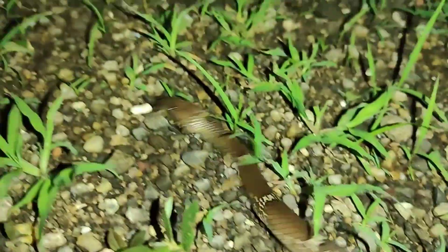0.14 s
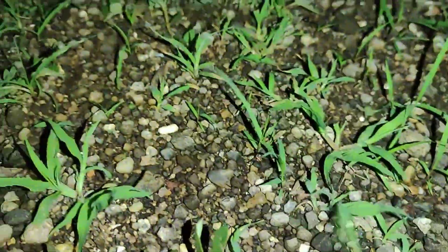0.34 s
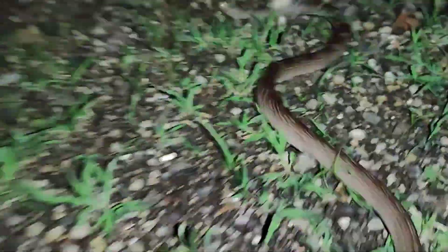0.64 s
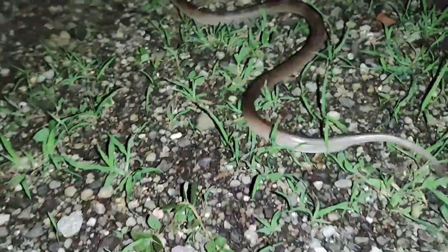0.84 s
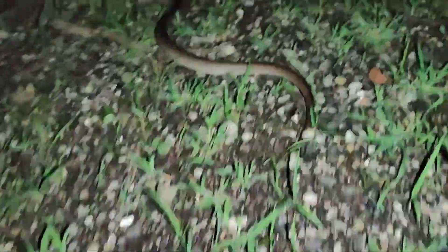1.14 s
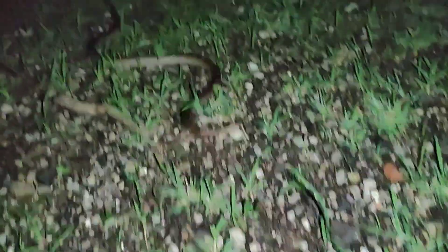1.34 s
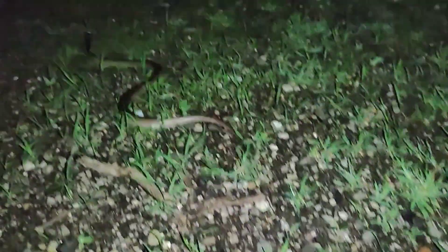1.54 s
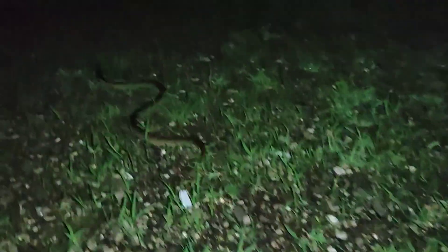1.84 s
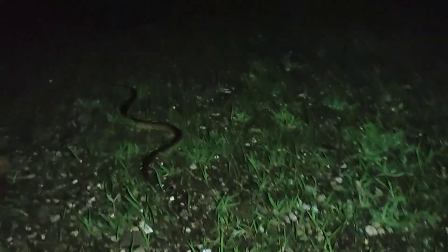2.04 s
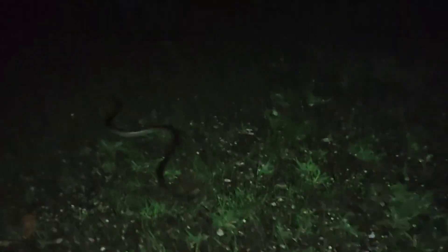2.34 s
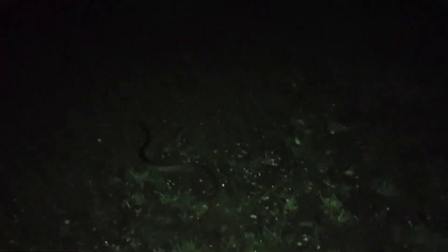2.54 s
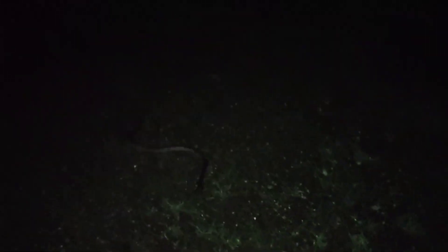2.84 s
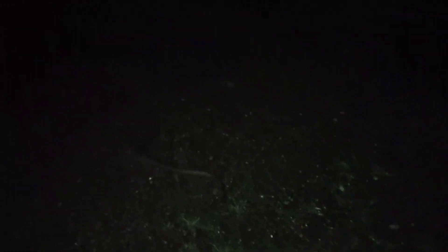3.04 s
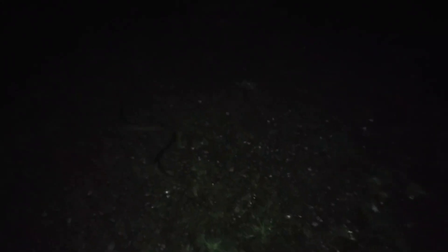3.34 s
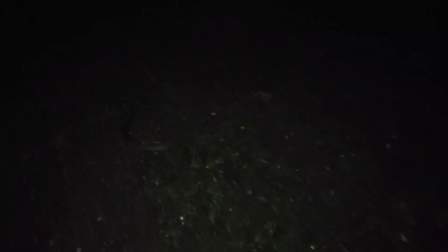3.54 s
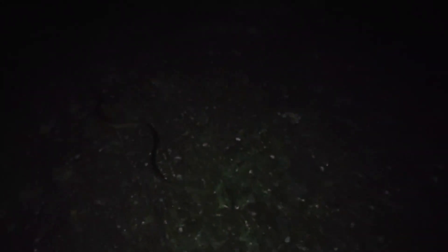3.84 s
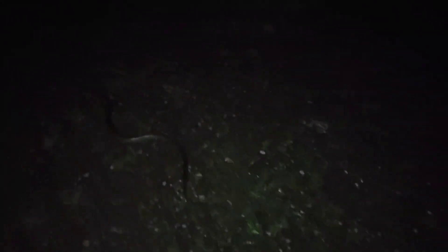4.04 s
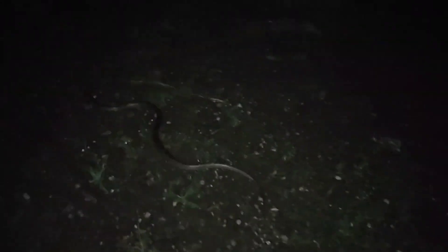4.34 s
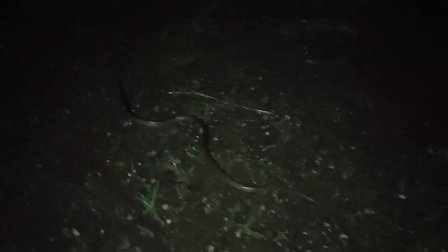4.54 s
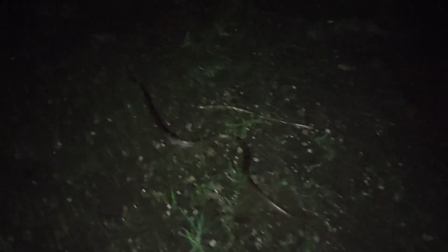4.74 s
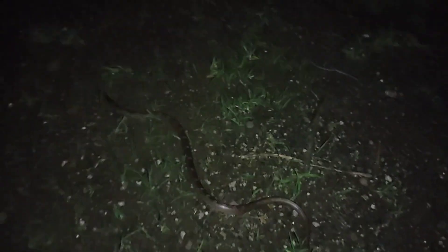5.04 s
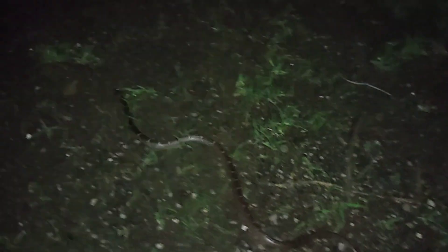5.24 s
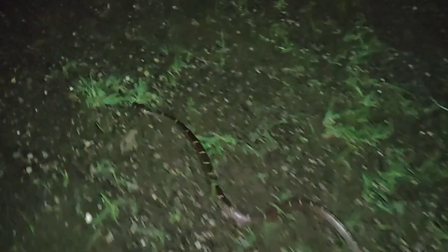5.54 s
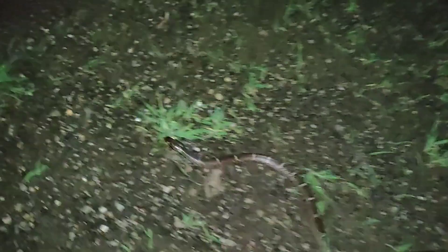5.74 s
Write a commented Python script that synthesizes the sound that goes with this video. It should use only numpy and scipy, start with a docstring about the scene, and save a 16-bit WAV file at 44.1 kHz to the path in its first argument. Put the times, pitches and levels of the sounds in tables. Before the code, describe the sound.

A high night chorus of crickets carries on over scuffing gravel steps, small stone clicks, rustling weeds and a faint distant bird.

```python
"""A walk through a night meadow with a hand-held two-port recorder. From the start, over hissing air
and a dull rumble, crickets stridulate: a far chorus, steady tree crickets and near ones trilling in
turns. Fingers rub the case, stones knock, weeds brush the legs and gravel crunches. A far bird begins
to whistle, dry stalks snap and wind puffs on the right port. Near one second a katydid starts to buzz
and something creaks briefly; about halfway through, a higher cricket joins with five chirps."""
import sys
import numpy as np
from scipy import signal
from scipy.fft import rfft, irfft
from scipy.io import wavfile

SR = 44100
rng = np.random.default_rng(int(sys.argv[2]) if len(sys.argv) > 2 else 0)


def generate_wav(sig):
    """Save sig (samples, or channels by samples) to the path in sys.argv[1] as 16-bit PCM at SR."""
    pcm = np.round(np.clip(np.atleast_2d(sig).T, -1, 1) * 32767).astype(np.int16)
    wavfile.write(sys.argv[1], SR, pcm)


N = 259749

# Spectrum of the night air. Each row: frequency in Hz, relative spectral density in dB.
AIR_SPECTRUM = [(30, -8.5), (60, 4), (140, -20.5), (300, -10.5), (1000, -18), (2200, -12.5), (2800, -11),
                (3350, -13.5), (4500, -6), (5750, -53), (6400, -27), (7300, -26), (9700, -16.5),
                (12000, -35), (16000, -29)]
# Drift of the air's level. Each row: time in seconds, gain in dB.
AIR_DRIFT = [(0, -0.5), (1, -1.5), (1.6, -2.5), (2.8, -0.5), (3.9, -2), (4.8, 1), (5.89, -2.5)]
# A dull far rumble. Each row: time in seconds, level in dB.
RUMBLE_LEVEL = [(0, -60), (1, -53.5), (1.5, -53), (1.9, -59), (2.4, -56), (3, -62), (4, -58.5),
                (5.2, -60.5), (5.89, -59)]
# Far cricket choruses, lowest first. Each row: pitch in Hz, pitch spread in Hz, glide in Hz,
# strokes per second, stroke length in seconds, level in dB, left minus right in dB.
CHORUSES = [(4098, 446, 346, 1100, 0.00657, -47.5, -4.5), (4982, 352, 370, 590, 0.0139, -48, -3.5),
            (6334, 500, 380, 500, 0.0128, -57, -5)]
# The low chorus and tree crickets grow as the walker nears. Each row: time in seconds, gain in dB.
NEARING_GAIN = [(0, -3), (1, -4), (1.55, -4), (1.9, 0.5), (3.3, 0), (4.4, 1.5), (5.89, 1)]
# Tree crickets. Each row: pitch in Hz, strokes per second, relative level in dB, left minus right in dB.
TREE_TRILLS = [(4086, 82, -54, 2), (4166, 58, -59, 6), (3917, 83, -61, -9)]
# Trills of near crickets. Each row: start in seconds, length in seconds, stroke count at mid-slowing,
# factor on the gaps, relative peak in dB, lead of the left port in microseconds at start and at end.
NEAR_CRICKET_TRILLS = [(-0.162, 0.39, 6.13, 0.95, -29.5, 37.0, 25.0),
                       (0.017, 0.37, 9.54, 1.017, -35.0, 55.0, 55.0),
                       (0.493, 0.38, 7.29, 0.952, -29.5, 27.0, 21.0),
                       (0.642, 0.35, 10.57, 1.007, -35.5, 55.0, 55.0),
                       (1.102, 0.36, 7.79, 0.935, -29.5, -5.0, 2.0),
                       (1.702, 0.41, 5.06, 0.895, -28.5, 110.0, 50.0),
                       (2.239, 0.06, 8.0, 1.08, -31.5, 35.0, 40.0),
                       (2.325, 0.27, 10.3, 0.95, -27.5, 38.0, 28.0),
                       (2.811, 0.38, 7.08, 1.033, -32.5, 20.0, 25.0),
                       (2.997, 0.38, 8.64, 0.933, -29.5, -5.0, -15.0),
                       (3.342, 0.35, 7.68, 0.974, -32.5, 40.0, 40.0),
                       (4.023, 0.35, 8.19, 1.012, -31.5, 25.0, 50.0),
                       (4.121, 0.19, 4.97, 0.998, -28.5, -40.0, -47.0),
                       (4.581, 0.41, 10.97, 1.085, -34.5, 35.0, 35.0),
                       (4.69, 0.31, 6.06, 0.997, -28.5, -35.0, -18.0),
                       (5.08, 0.29, 10.89, 1.162, -32.5, -30.0, -20.0),
                       (5.273, 0.38, 7.42, 0.958, -27.5, 28.0, 15.0),
                       (5.69, 0.21, 6.77, 1.017, -29.5, -65.0, -65.0)]
# Fingers rubbing the case. Each row: start in seconds, length in seconds, level in dB.
FINGER_RUBS = [(0, 0.29, -47), (0.196, 0.28, -42), (0.47, 0.35, -55), (0.856, 0.095, -35),
               (0.955, 0.1, -54), (1.048, 0.054, -43), (2.312, 0.0099, -45), (4.905, 0.072, -48),
               (5.699, 0.014, -40.5)]
# Stone knocks and finger taps. Each row: time in seconds, peak in dB, ring frequency in Hz.
KNOCKS_AND_TAPS = [(0.017, -38, 420), (0.098, -39, 208), (0.119, -42, 197), (0.205, -47, 410),
                   (0.1806, -32, 2240), (0.3702, -40, 2410), (0.7169, -37, 3400), (0.803, -33, 2000),
                   (0.779, -33, 1440), (0.788, -33.5, 1130), (0.861, -29.5, 370), (0.908, -24.5, 290),
                   (1.063, -37, 211), (1.083, -29, 259), (1.796, -46, 840), (1.819, -43, 1520),
                   (1.865, -28, 2370), (1.8797, -16, 1840), (1.886, -36, 1300), (1.905, -27, 1340),
                   (1.923, -21, 1700), (1.929, -25, 1570), (1.94, -36, 1330), (1.9733, -12.5, 2050),
                   (2.135, -21, 2140), (2.198, -36, 1800), (2.1905, -48, 1500), (2.221, -28.5, 1400),
                   (2.238, -37, 796), (2.386, -44, 860), (2.397, -36.5, 1050), (2.217, -31.5, 945),
                   (2.15, -35.5, 980), (2.274, -33, 1000), (2.307, -43, 915), (2.443, -35.5, 1260),
                   (2.9, -41, 980), (2.932, -36, 1400), (3.131, -42.5, 700), (3.244, -40, 1320),
                   (3.34, -39, 1310), (3.417, -48, 760), (3.423, -40, 600), (3.439, -36, 573),
                   (3.503, -36, 1480), (3.744, -34.5, 856), (3.886, -43, 660), (4.316, -32, 840),
                   (4.432, -40.5, 1100), (4.664, -39, 750), (4.884, -44, 660), (4.914, -43, 496),
                   (4.888, -32, 2360), (4.318, -33, 2100), (5.069, -35.5, 774), (5.073, -24, 1970),
                   (5.127, -28.5, 1710), (5.505, -37, 1950), (5.591, -38, 2100), (5.715, -36, 1120),
                   (5.748, -35, 1320), (5.825, -36, 1200), (5.835, -39, 1300), (5.771, -28, 740),
                   (5.773, -15, 1290)]
# Weeds brushing the legs. Each row: start in seconds, length in seconds, level in dB.
WEED_BRUSHES = [(0.126, 1, -49.5), (0.35, 0.1, -49.5), (0.506, 0.082, -49), (0.583, 0.12, -46),
                (0.779, 0.034, -45.5), (1.22, 0.3, -49.5), (1.466, 0.24, -57.5), (1.779, 0.21, -48.5),
                (2.146, 0.1, -57), (4.09, 0.052, -55), (5.054, 0.12, -58.5), (5.688, 0.23, -50)]
# Gravel under the shoes. Each row: start in seconds, length in seconds, relative level in dB,
# lower and upper band edges in Hz.
GRAVEL_SCUFFS = [(0.137, 0.76, -50.5, 1110, 3370), (0.766, 0.042, -44.5, 604, 4000),
                 (1.24, 0.18, -43, 1510, 4730), (1.77, 0.074, -51.5, 670, 2520),
                 (1.85, 0.11, -38, 725, 3600), (1.79, 0.16, -42.5, 795, 3200),
                 (1.94, 0.056, -46, 700, 2500), (1.98, 0.19, -54.5, 636, 2500),
                 (2.091, 0.17, -50, 690, 2980), (2.183, 0.36, -50, 715, 2360),
                 (2.308, 0.022, -45.5, 302.6, 1440), (2.95, 0.32, -64, 920, 2820),
                 (3.2, 0.26, -56, 670, 1890), (4.42, 0.21, -55, 1490, 3000), (0.98, 0.5, -57.5, 786, 3000),
                 (3.409, 0.086, -45, 290, 2040), (3.49, 0.17, -45.5, 890, 2280),
                 (3.733, 0.051, -50.5, 296, 1480), (3.868, 0.048, -46.5, 298, 2960),
                 (4.307, 0.045, -42, 298, 3550), (4.34, 0.092, -47.5, 507, 3040),
                 (4.639, 0.043, -49.5, 200, 1390), (4.8, 0.18, -52, 1510, 3050),
                 (4.86, 0.053, -58.5, 300, 875), (5.062, 0.099, -42.5, 305, 3100),
                 (5.198, 0.092, -54, 305, 2200), (5.492, 0.021, -50, 810, 2320),
                 (5.703, 0.04, -49.5, 195.7, 1750), (5.72, 0.08, -42.5, 6860, 8800),
                 (5.732, 0.21, -41, 627, 3650), (5.766, 0.016, -37.5, 400, 880)]
# A far night bird, one list a whistle. Each row: time in seconds, pitch in Hz, relative level in dB.
BIRD_WHISTLES = [
    [(.17, 2250, -62), (.55, 2380, -57), (.68, 2224, -56), (.71, 2220, -73)],
    [(1.26, 2250, -60), (1.38, 2260, -57), (1.43, 2178, -55), (1.52, 2274, -56), (1.565, 2120, -62),
     (1.59, 1750, -58), (1.625, 1750, -66), (1.66, 1760, -59), (1.69, 1800, -66), (1.77, 2000, -64)],
    [(2.41, 2090, -60), (2.54, 2097, -54.5), (2.64, 2070, -51), (2.67, 2180, -46), (2.715, 2040, -53),
     (2.722, 1830, -57), (2.76, 1740, -57), (2.79, 1710, -56)],
    [(2.792, 2150, -53), (2.808, 2070, -54), (2.84, 1680, -62)],
    [(4.56, 2132, -66), (4.7, 2030, -60), (4.74, 2030, -72), (4.79, 2130, -61), (4.83, 2020, -59),
     (4.89, 1780, -61)],
    [(5.45, 2066, -70), (5.72, 2230, -60), (5.78, 2280, -55), (5.89, 2160, -57)],
]
# Dry stalks snapping. Each row: time in seconds, peak in dB, ring frequency in Hz.
STALK_SNAPS = [(0.4244, -29, 12300), (0.4341, -36, 9080), (0.521, -28, 11000), (0.5362, -23, 11800),
               (0.578, -35, 10000), (0.623, -23, 6750), (0.6522, -19, 11000), (0.6584, -19, 12900),
               (0.781, -40, 12500), (0.79, -29, 11500), (0.8031, -27, 12000), (1.7575, -29, 8500),
               (2.1567, -27, 7460), (2.1648, -35, 7530), (2.1903, -37, 8300), (2.1981, -15, 7660),
               (2.1985, -32, 12600), (2.2207, -33, 9270), (2.2497, -31, 9000), (4.12, -40, 9800)]
# Wind puffs. Each row: start in seconds, length in seconds, relative level in dB.
WIND_PUFFS = [(0.454, 0.67, -77), (2.45, 0.25, -57.5), (3.676, 0.17, -52), (4.1, 0.22, -78),
              (4.406, 0.4, -46.5), (4.69, 0.036, -36), (5.033, 0.36, -52), (5.736, 0.056, -33)]
# The katydid's voice. Each row: time in seconds, level in dB, wing resonance in Hz.
KATYDID_VOICE = [(.84, -54, 9970), (1.2, -59.5, 9900), (1.5, -54, 9800), (1.9, -60.5, 9600),
                 (2.6, -60.5, 9750), (3.1, -59.5, 9800), (3.6, -58, 9520), (3.9, -52.5, 9420),
                 (4.2, -53, 9760), (4.5, -55.5, 9850), (4.8, -59, 9450), (5.1, -61.5, 10000),
                 (5.4, -57.5, 9100), (5.6, -56, 9760), (5.89, -59, 9500)]
# The katydid's phrases. Each row: start in seconds, end in seconds.
KATYDID_SPANS = [(.835, 2.05), (2.265, 2.65), (3.105, 3.65), (3.875, 5.89)]
# A short creak. One row: start in seconds, end in seconds, pitch in Hz.
CREAK_NOTE = (1.135, 1.22, 240)
# Partials of the creak. Each row: harmonic number, level in dB.
CREAK_PARTIALS = [(1, -49), (2, -51), (3, -64), (4, -64), (5, -62)]
# Chirps of the higher cricket. Each row: start in seconds, relative level in dB.
HIGH_CRICKET_CHIRPS = [(2.987, -41.5), (3.229, -39.5), (3.437, -39.5), (3.724, -39.5), (3.931, -44)]
# Strokes of one such chirp. Each row: delay in seconds, gain in dB.
CHIRP_STROKES = [(0, -11), (.021, -6), (.043, -5), (.085, -2.5), (.124, -4)]

STROKE_TOP_HZ, STROKE_END_HZ, STROKE_S = 5396, 4677, 0.0165   # a near cricket's full stroke
QUICK_GAP_S, SLOW_GAP_S, SLOWING_STROKES = .0190, .0342, 1.46
ONSET_LOSS_DB, ONSET_STROKES, QUICK_LOSS_DB = 3, 1.5, 4
GROUND_LAG_S = 0.00019   # sounds from the ground reach the left port later


def from_db(db):
    """Amplitude ratio: tenfold for every 20 dB."""
    return 10 ** (np.asarray(db) / 20)


def rms_one(x):
    """Normalisation to unit mean power."""
    return x / np.sqrt(np.mean(x ** 2) + 1e-20)


def in_time(rows):
    """Linear interpolation of a table's columns, one value a sample."""
    s, *columns = np.transpose(rows)
    return [np.interp(np.arange(N) / SR, s, c) for c in columns]


def wobble(per_s):
    """Random modulation: straight lines between Gaussian values."""
    points = rng.standard_normal(N // 100)
    return np.interp(np.arange(N) * per_s / SR, np.arange(len(points)), points)


def band(x, low_hz, high_hz):
    """Butterworth band-pass filtering."""
    sos = signal.butter(2, [low_hz, min(high_hz, .45 * SR)], "band", fs=SR, output="sos")
    return signal.sosfilt(sos, x)


def placed(x, pan_db, lag_s):
    """Direction as level and time differences: the left port gains pan_db and lags by lag_s."""
    left = np.interp(np.arange(N) - lag_s * SR, np.arange(N), x)
    return np.array([left * from_db(pan_db / 2), x * from_db(-pan_db / 2)])


def add(out, s, sound):
    """Superposition of a short sound, starting at s seconds."""
    i = max(round(s * SR), 0)
    out[..., i:i + sound.shape[-1]] += sound[..., :max(N - i, 0)]


def air():
    """Coloured noise: the hiss of the night, partly coherent between the ports."""
    white = rng.standard_normal((2, N))
    hz = np.maximum(np.arange(N // 2 + 1) * SR / N, 1)
    knot_hz, knot_db = np.transpose(AIR_SPECTRUM)
    colour = from_db(np.interp(np.log(hz), np.log(knot_hz), knot_db))
    hiss = rms_one(irfft(rfft(white + 0.11 * white[::-1]) * colour, N))
    level_db = -51.5 + in_time(AIR_DRIFT)[0] + 1.56 * wobble(4.893)
    return from_db(level_db) * hiss * from_db([[-1.5], [1.5]])


def rumble():
    """Amplitude-modulated low noise: a lumpy rumble, nearly the same in both ports."""
    low = band(band(rng.standard_normal(N), 94, 218), 94, 218)
    lumpy = rms_one(low * from_db(4.0 * wobble(22.0)))
    return placed(from_db(in_time(RUMBLE_LEVEL)[0]) * lumpy, pan_db=0.26, lag_s=0.00051)


def wing_stroke(top_hz, end_hz, length_s, phase, sharpness=0.66):
    """Stridulation: as a wing closes, the scraper slows along the file and the pitch falls."""
    progress = np.linspace(0, 1, max(int(length_s * SR), 8))
    envelope = np.sin(np.pi * progress ** .75) ** sharpness
    hz = top_hz + (end_hz - top_hz) * progress
    return envelope * np.sin(phase + 2 * np.pi * np.cumsum(hz) / SR)


def far_chorus():
    """Incoherent summation: many crickets stroke at unrelated moments from all sides."""
    out, nearing_db = np.zeros((2, N)), in_time(NEARING_GAIN)[0]
    for chorus, gain_db in zip(CHORUSES, (nearing_db, 0, 0)):
        hz, spread_hz, glide_hz, per_s, length_s, db, pan_db = chorus
        layer = np.zeros((2, N))
        for when, up, down, size_db, turn, side in rng.random((int(per_s * N / SR), 6)):
            top_hz = hz + spread_hz * (up - down) + glide_hz / 2
            for port, phase_shift in enumerate((0, 6.7 * (side - .3))):
                tone = wing_stroke(top_hz, top_hz - glide_hz, length_s, 2 * np.pi * turn + phase_shift)
                add(layer[port], when * N / SR, from_db(size_db) * tone)
        out += from_db(db + gain_db) * rms_one(layer) * from_db([[pan_db / 2], [-pan_db / 2]])
    return out


def tree_crickets():
    """Amplitude modulation: a tone pulsed at the stroke rate, pitch and rate wandering a little."""
    out = 0
    for hz, per_s, db, pan_db in TREE_TRILLS:
        stroke_phase = 2 * np.pi * np.cumsum(per_s + 1.1 * wobble(3.0)) / SR
        pulses = (.5 + .5 * np.cos(stroke_phase)) ** 1.1
        carrier = np.sin(2 * np.pi * np.cumsum(hz + 7 * wobble(8.0)) / SR)
        trill = from_db(db + 0.14 * wobble(11.0)) * rms_one(pulses * carrier)
        out = out + placed(trill, pan_db, lag_s=.00003)
    return out * from_db(in_time(NEARING_GAIN)[0])


def trill_strokes():
    """Pulse trains that slow and grow. Each row: time and gap in seconds, dB, lead in microseconds."""
    rows, k = [], np.arange(20)
    for start, length, knee, stretch, db, start_lead, end_lead in NEAR_CRICKET_TRILLS:
        slowed = 1 / (1 + np.exp((knee - k) / SLOWING_STROKES))
        gaps = stretch * (QUICK_GAP_S + (SLOW_GAP_S - QUICK_GAP_S) * slowed)
        after = np.cumsum(gaps) - gaps
        loss_db = ONSET_LOSS_DB * np.exp(-k / ONSET_STROKES) + QUICK_LOSS_DB * (1 - slowed)
        level_db = db - loss_db - 0.1 * rng.standard_normal(len(k))
        lead_us = start_lead + (end_lead - start_lead) * after / length
        heard = (after < length + QUICK_GAP_S / 2) & (start + after > 0)
        rows += list(np.transpose([start + after, gaps, level_db, lead_us])[heard])
    return rows


def near_crickets():
    """Stridulation with ground reflections; quick strokes are shorter and sweep less in pitch."""
    echoes = rng.standard_normal((2, 2600)) * from_db(-60 * np.arange(2600) / SR / 0.2)
    echoes /= np.sqrt(np.sum(echoes ** 2) / 2)
    out, chance = np.zeros((2, N)), rng.random((20 * len(NEAR_CRICKET_TRILLS), 2))
    for (s, gap, db, lead_us), (turn, detune) in zip(trill_strokes(), chance):
        length = min(STROKE_S, .75 * gap)
        sweep_hz = (STROKE_TOP_HZ - STROKE_END_HZ) * length / STROKE_S
        top_hz = (STROKE_TOP_HZ + STROKE_END_HZ + sweep_hz) / 2 + 140 * (detune - .5)
        end_hz = top_hz - sweep_hz
        phase, phase_lead = 2 * np.pi * turn, 2 * np.pi * lead_us * 1e-6 * STROKE_TOP_HZ
        third_harmonic = .011 * wing_stroke(3 * top_hz, 3 * end_hz, length, 3 * phase)
        for port, side in enumerate((.5, -.5)):
            tone = wing_stroke(top_hz, end_hz, length, phase + side * phase_lead, sharpness=1.31)
            add(out[port], s - 0.42 * length, from_db(db + .3 - 2.4 * side) * (tone + third_harmonic))
    out *= 1 + 0.25 * wobble(300.0)   # wing flutter
    return out + from_db(-9.5) * signal.fftconvolve(out, echoes, axes=1)[:, :N]


def grains(per_s, spread_db):
    """Shot noise: two independent streams of random clicks of uneven size."""
    sizes = from_db(spread_db * np.minimum(rng.exponential(1, (2, N)), 5))
    signs = rng.choice([-1, 1], (2, N))
    return rms_one(sizes * signs * (rng.random((2, N)) < per_s / SR))


def swell(size):
    """An asymmetric envelope that rises a little faster than it fades."""
    return np.abs(np.sin(np.pi * np.linspace(0, 1, size) ** .7)) ** .5


def noise_swells(rows, noise):
    """Windowed noise: each row cuts out a piece, keeps one band, and swells and fades it."""
    out = np.zeros(noise.shape)
    for s, length, db, low_hz, high_hz in rows:
        first, envelope = max(round(s * SR), 0), swell(int(length * SR))
        piece = rms_one(band(noise[..., first:first + len(envelope)], low_hz, high_hz))
        add(out, s, from_db(db) * piece * envelope[:piece.shape[-1]])
    return out


def finger_rubs(band_hz=(128, 784)):
    """Friction noise: fingers on the case are heard as dull lumps in both ports."""
    rubs = noise_swells([(*row, *band_hz) for row in FINGER_RUBS], grains(700, 1.04)[0])
    return placed(rubs, pan_db=-1.4, lag_s=0.00037)


def impacts(rows, cycles, width, click):
    """Impulse excitation: a knock or snap is a click and decaying noise, ringing about one pitch."""
    out, t = np.zeros(N), np.arange(1500) / SR
    for s, db, hz in rows:
        noise = rng.standard_normal(len(t)) * np.exp(-t * hz / cycles)
        impulse = click * np.sqrt(SR / hz) * (t == 0)
        burst = band(noise + impulse, hz / width, hz * width)
        add(out, s, burst * from_db(db) / np.max(np.abs(burst)))
    return out


def weeds():
    """Friction as shot noise: weeds brush the legs in swells of bright crackle over a steady rustle."""
    crackle = grains(3500, 3.4) * from_db(2 * wobble(45.0))
    treble = band(crackle + 0.086 * crackle[::-1], 4100, 12900)
    brush = rms_one(treble + 1.9 * band(crackle, 2130, 3340))
    rustle = from_db(-58) * rms_one(band(crackle, 1500, 11200))
    envelope = np.zeros(N)
    for s, length, db in WEED_BRUSHES:
        add(envelope, s, from_db(db) * swell(int(length * SR)) ** 1.73)
    return (envelope * brush + rustle) * from_db([[-2], [2]])


def pebbles(per_s, spread_db, cycles):
    """Damped resonance: clicks strike stones of 14 sizes, each dying by 60 dB in the given cycles."""
    clicks, stone, out = grains(per_s, spread_db)[0], rng.integers(0, 14, N), 0
    for k, hz in enumerate(np.geomspace(350, 4200, 14)):
        radius, angle = from_db(-60 * hz / (cycles * SR)), 2 * np.pi * hz / SR
        strikes = clicks * (stone == k) + 1e-18
        ring = signal.lfilter([np.sin(angle)], [1, -2 * radius * np.cos(angle), radius ** 2], strikes)
        out = out + hz ** 1.49 * ring
    return rms_one(out)


def gravel():
    """Many small collisions: each scuff is a shower of pebble clicks over sliding grit."""
    stones = pebbles(per_s=2200, spread_db=2.4, cycles=12.0) + .45 * grains(4000, 1.8)[0]
    crunch = placed(stones, pan_db=-5, lag_s=GROUND_LAG_S) + .45 * grains(4000, 1.8)
    return from_db(1.26) * noise_swells(GRAVEL_SCUFFS, crunch * from_db(2.8 * wobble(80.0)))


def bird():
    """Random pitch and level modulation make a whistle hoarse; its octave grows as the note drops."""
    out, tremble, hoarse = np.zeros(N), wobble(40.0), wobble(260.0)
    breaks_db = -8 * np.clip(wobble(30.0) - .3, 0, 2)
    for whistle in BIRD_WHISTLES:
        s, hz, db = np.transpose(whistle)
        t = np.arange(s[0], s[-1], 1 / SR)
        i, pitch = (t * SR).astype(int), np.interp(t, s, hz)
        phase = 2 * np.pi * np.cumsum(pitch + 30 * tremble[i] + 50 * hoarse[i]) / SR
        octave = np.clip((2150 - pitch) / 200, .15, 1.8) * np.sin(2 * phase)
        level_db = np.interp(t, s, db) + 3.2 * hoarse[-i] + breaks_db[i]
        add(out, s[0], from_db(level_db) * (np.sin(phase) + octave))
    return placed(1.5 * out, pan_db=-4, lag_s=.00003)


def wind(band_hz=(35.2, 103)):
    """Turbulent pressure: low puffs buffet mostly the right port."""
    puffs = noise_swells([(*row, *band_hz) for row in WIND_PUFFS], rng.standard_normal((2, N)))
    return puffs * from_db([[-12], [4]])


def katydid(buzz_s=.078, period_s=.0967, scrape_hz=245):
    """Forced resonance: each buzz is a train of noisy tooth scrapes ringing a broad wing resonance."""
    out, t = np.zeros((2, N)), np.arange(int(buzz_s * SR)) / SR
    level_db, wing_hz = in_time(KATYDID_VOICE)
    scrapes = (.5 + .5 * np.cos(2 * np.pi * scrape_hz * t)) ** 1.2 * np.sin(np.pi * t / t[-1]) ** .35
    for start, end in KATYDID_SPANS:
        for s in np.arange(start, end, period_s):
            db, hz = level_db[int(s * SR)], wing_hz[int(s * SR)]
            buzz = band(scrapes * rng.standard_normal((2, len(t))), hz - 330, hz + 330)
            add(out, s, from_db(db) * rms_one(buzz) * from_db([[2.0], [-2.5]]))
    return out


def creak():
    """A harmonic series on a slightly shaky fundamental swells and stops."""
    start, end, hz = CREAK_NOTE
    out, t = np.zeros(N), np.arange(int((end - start) * SR)) / SR
    phase = 2 * np.pi * np.cumsum(hz + 16 * wobble(150.0)[:len(t)]) / SR
    tone = sum(from_db(db) * np.sin(k * phase) for k, db in CREAK_PARTIALS)
    add(out, start, tone * np.sin(np.pi * t / t[-1]) ** .5)
    return placed(out, pan_db=-2.5, lag_s=0)


def high_cricket():
    """Stridulation in groups: five falling strokes make each chirp."""
    out, tone = np.zeros(N), wing_stroke(top_hz=6700, end_hz=5950, length_s=.016, phase=0)
    for s, db in HIGH_CRICKET_CHIRPS:
        for delay, stroke_db in CHIRP_STROKES:
            add(out, s + delay, from_db(db + stroke_db) * tone)
    return out * from_db([[-2], [-5]])


def scene():
    """Linear superposition: the pressures of all sources add at each port."""
    animals = near_crickets() + far_chorus() + tree_crickets() + katydid() + bird() + high_cricket()
    knocks = impacts(KNOCKS_AND_TAPS, cycles=2.9, width=1.325, click=1.1)
    snaps = impacts(STALK_SNAPS, cycles=4.0, width=1.3, click=1.2)
    hits = placed(knocks, pan_db=-4.0, lag_s=GROUND_LAG_S) + placed(snaps, pan_db=-3.5, lag_s=.0001)
    return animals + hits + gravel() + weeds() + finger_rubs() + wind() + creak() + rumble() + air()


def record(dry):
    """Steep low-pass filtering: everything above 16.8 kHz is at least 60 dB down."""
    return signal.sosfilt(signal.cheby2(12, 60, 16800, fs=SR, output="sos"), dry)


dry = scene()
out = record(dry)
generate_wav(out)
```